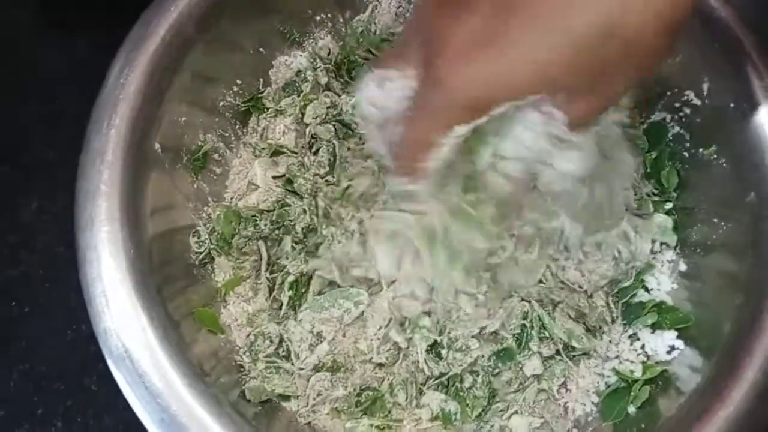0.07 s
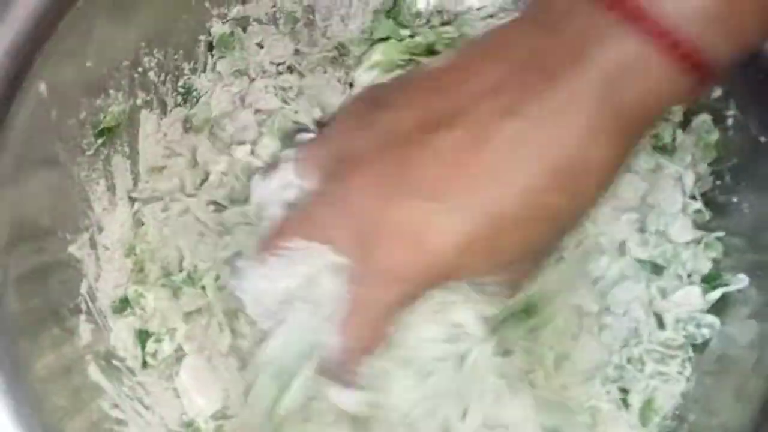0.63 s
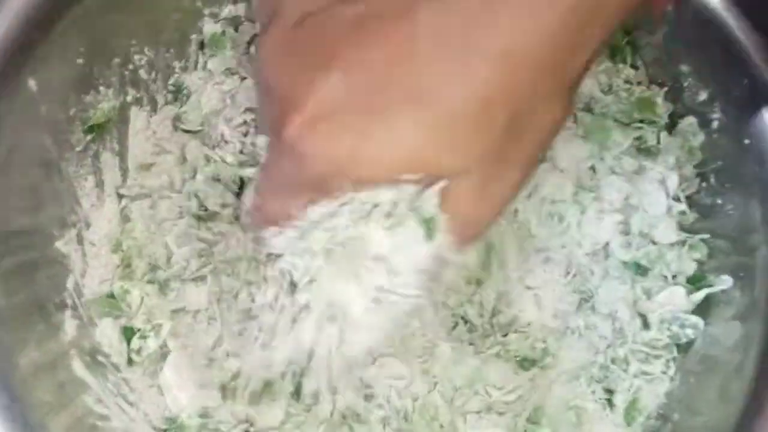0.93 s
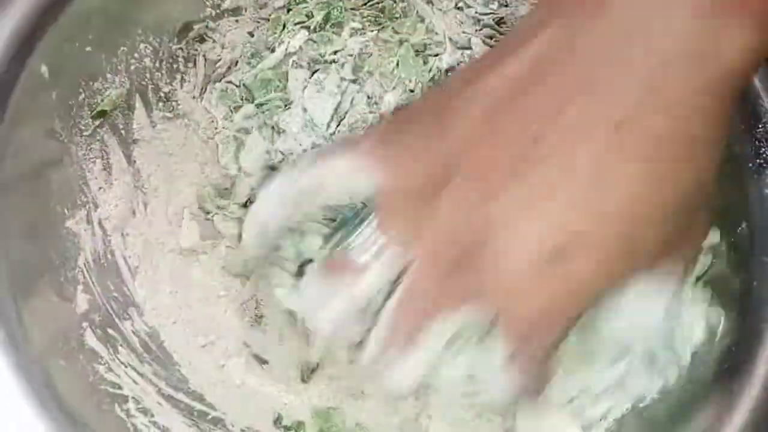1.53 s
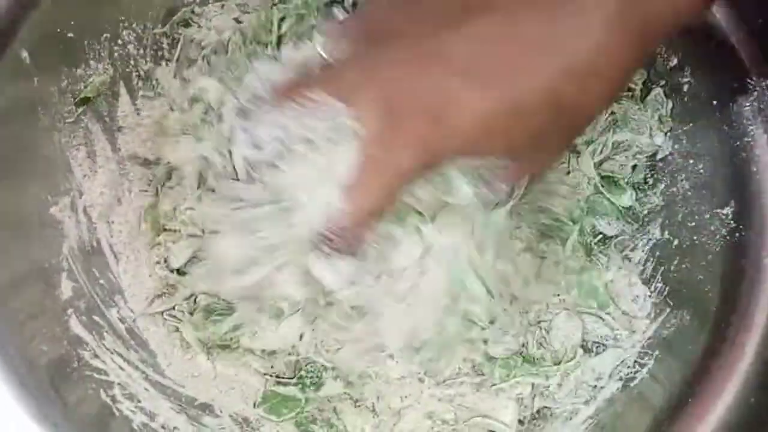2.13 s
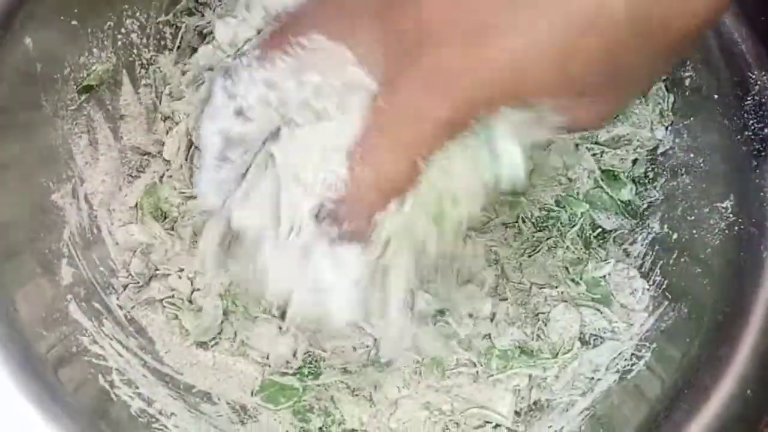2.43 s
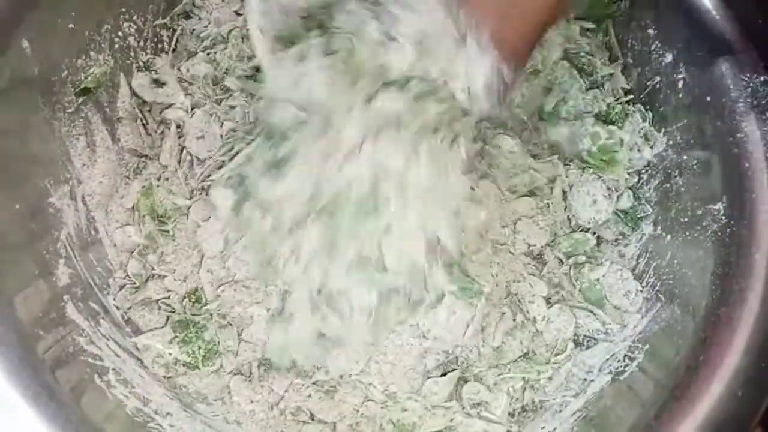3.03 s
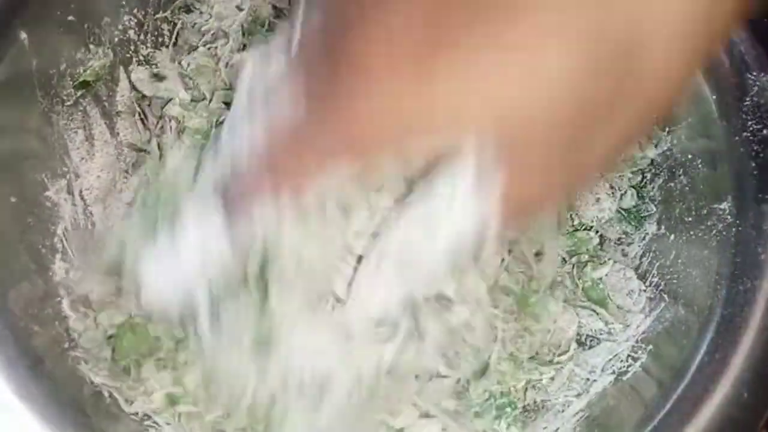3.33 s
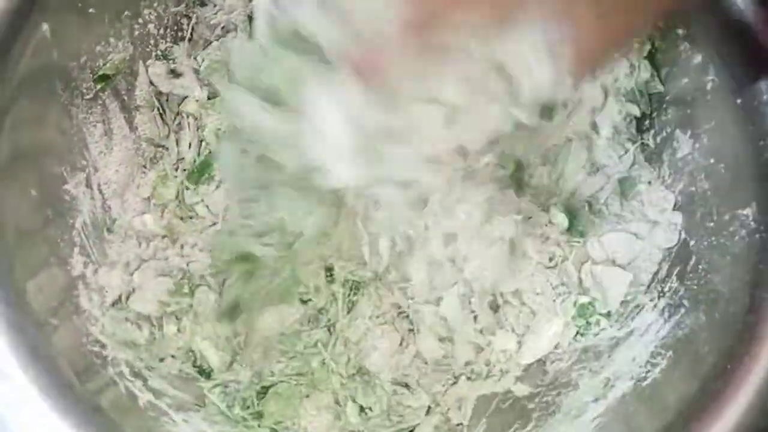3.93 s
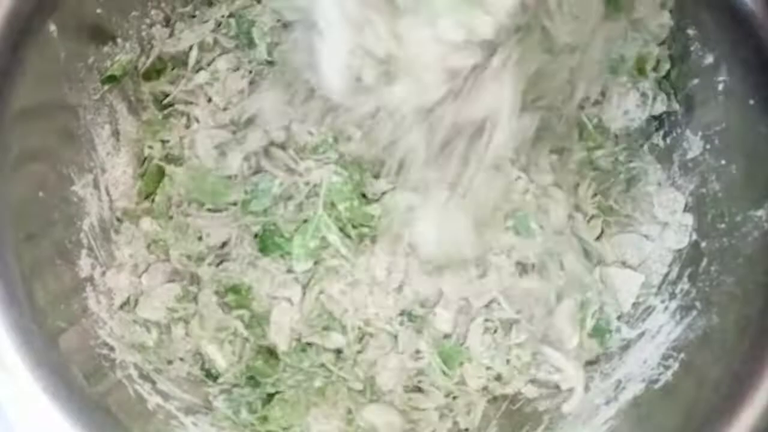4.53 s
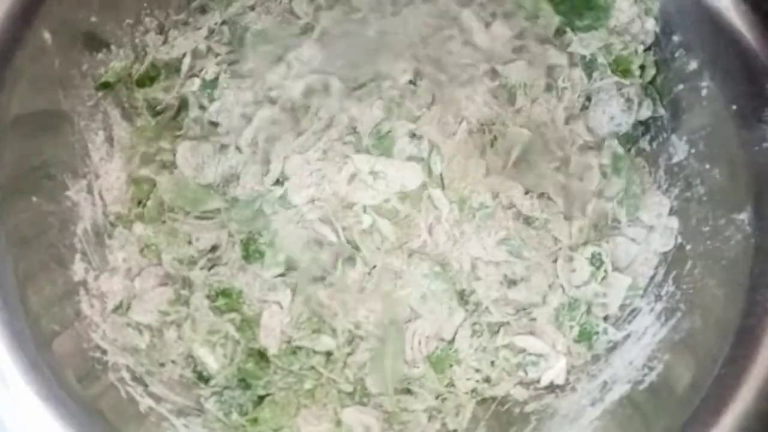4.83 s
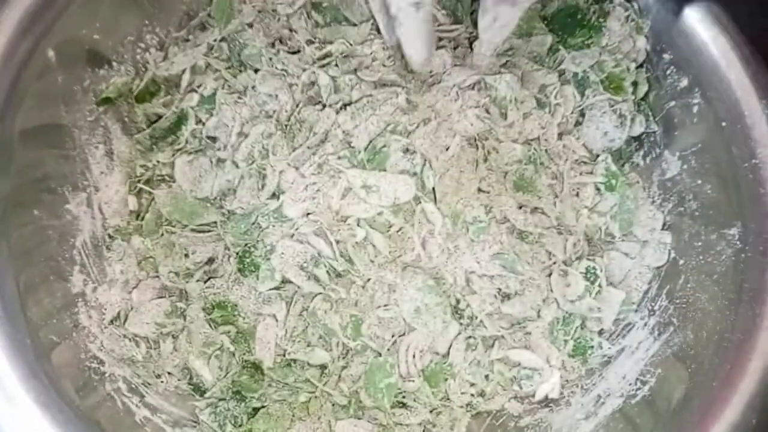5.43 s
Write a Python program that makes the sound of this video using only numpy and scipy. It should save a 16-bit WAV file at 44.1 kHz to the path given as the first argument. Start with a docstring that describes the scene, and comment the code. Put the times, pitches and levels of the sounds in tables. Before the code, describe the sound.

A thin, high hiss swells in during the first half second and holds throughout, over a low room rumble. Close up in a small kitchen, a hand mixes dry flour and chopped leaves in a steel bowl: powder fizzes, leaves crackle and grit sweeps along the metal, with faint rubbing squeaks. Digging strokes come at about 0.4, 1.3, 1.9, 2.5, 2.8, 3.5, 4.2 and 4.7 seconds, strongest at 1.3 and 3.5, and softer trickles of flour fall between them. The hand bumps the bowl with dull, barely ringing thuds, clearest around 0.4, 1.3, 3.7 and 4.3 seconds. A finger ring, nails and stalks tick brightly on the steel, sharpest just after 1.3 seconds and again near 3.7 and 4.2. From 4.5 seconds a few faint chirps sound farther off, clearest near 5.4. The stirring fades after about 4.9 seconds, with two soft bumps around 5.5.

```python
"""A thin, high hiss swells in over a low room rumble and holds. Close up, in a small kitchen, a hand
digs through dry flour and chopped leaves in a steel bowl and lets each handful trickle back.
Countless tiny slips make the powder fizz, the leaves crackle and both sweep along the steel, where
dry rubbing sings faintly. The hand bumps the bowl with a dull thud; a finger ring, nails and stalks
tick on it. Near the end a few faint chirps sound farther off, and the flour settles."""
import sys
import numpy as np
from scipy import signal
from scipy.fft import rfft, irfft, next_fast_len
from scipy.io import wavfile

SR = 44100
rng = np.random.default_rng(int(sys.argv[2]) if len(sys.argv) > 2 else 0)


def dump(signal):
    """Clip the signal to [-1, 1] and save it as 16-bit WAV at the path in sys.argv[1]."""
    limited = np.clip(np.atleast_2d(signal).T, -1, 1)
    pcm = np.round(limited * 32767).astype(np.int16)
    wavfile.write(sys.argv[1], SR, pcm)


N = 245496
TIME = np.arange(N) / SR

# tone of the bed, high hiss and room rumble: (frequency [Hz], relative level [dB])
DRONE_EQ = [(3500, -33), (5000, -34), (5800, -30), (6500, -15.5), (6900, -1), (7450, 4), (7950, -0.5),
            (8300, -10.5), (8750, -27), (9300, -37), (10000, -56), (10450, -31), (11200, -52), (15500, -53)]
RUMBLE_EQ = [(20, -46), (35, -19), (55, -18), (74, 1.5), (88, 0.5), (100, -7.5), (135, 0), (230, -4),
             (330, -1), (480, -8.5), (700, -10.5), (1200, -15.5), (2400, -14.5), (4400, -21), (9000, -24.5),
             (15500, -34)]
# the kitchen's decay: (frequency [Hz], t60 [s])
KITCHEN_DECAY = [(100, 0.15), (500, 0.31), (3000, 0.2), (12000, 0.054)]
# faint chirps, one list of breakpoints each: (time [s], pitch [Hz], level [dB])
CHIRP_GLIDES = [
    [(4.54, 2133, -64), (4.60, 2087, -65), (4.63, 2137, -66)],
    [(5.11, 1880, -54), (5.138, 2050, -53), (5.165, 2040, -59)],
    [(5.364, 2180, -49), (5.375, 2356, -43.5), (5.388, 1980, -57), (5.400, 1800, -47.5), (5.412, 1976, -55),
     (5.424, 2300, -40.5), (5.438, 2004, -57), (5.455, 2270, -57), (5.485, 1810, -57)],
]
# modes of the bowl, damped by its load: (frequency [Hz], relative level [dB], t60 [s])
BOWL_MODES = [(220.3, 1, 0.17), (270, 8.5, 0.052), (299, 7.5, 0.063), (377.6, 8.5, 0.089),
              (504, 8.5, 0.032), (573, 0, 0.06), (622, -8, 0.12), (717.6, 0, 0.15), (789, 11.5, 0.039),
              (1004, 1.5, 0.045), (1203, -9, 0.14), (1653, -9, 0.11), (2410, -5.5, 0.9)]
# the hand bumps the bowl: (time [s], relative ring level [dB], brightness [Hz], thud level [dB],
# thud pitch [Hz], mode with a node at the struck spot [Hz])
BOWL_BUMPS = [(0.192, -57, 1500, -40, 65, 600), (0.411, -54, 1510, -28.5, 310, 794),
              (0.488, -47, 600, -29, 157, 690), (1.087, -53, 400, -35, 160, 506),
              (1.120, -53.5, 1500, -33, 780, 290), (1.272, -28, 890, -21, 337, 873),
              (2.198, -49.5, 2010, -36, 801, 294), (2.848, -47, 1000, -52, 248, 610),
              (2.915, -50.5, 1510, -38, 400, 594), (3.558, -39, 415, -28, 357, 258),
              (3.704, -31, 830, -26, 214, 480), (3.716, -37.5, 900, -44, 207, 1006),
              (3.759, -50, 500, -39, 205, 330), (4.250, -34.5, 587, -32, 410, 680),
              (4.285, -45, 550, -54, 327, 665), (5.506, -49, 300, -36, 303, 497),
              (5.552, -43, 300, -35, 250, 505)]
# ring, nails and stalks on steel: (time [s], level [dB], pitch [Hz], relative scatter level [dB])
STEEL_TICKS = [(1.093, -36, 6400, -3), (1.2728, -26.5, 6850, -0.5), (1.285, -27, 6300, -9),
               (1.3335, -13, 6270, -24), (2.2, -34, 6370, -11), (2.8362, -39, 5900, -8),
               (3.358, -34, 5970, -11), (3.4576, -43, 6300, -13), (3.652, -25, 6300, -9),
               (4.1584, -28.5, 6000, -10), (4.264, -36, 6440, 0), (4.9208, -45, 5860, -9),
               (5.4611, -45, 5740, -12)]
# dry rubbing sings out: (middle [s], half length [s], pitch [Hz], width [Hz], level [dB])
RUB_SQUEAKS = [(0.09, 0.086, 2677, 90, -59.5), (0.374, 0.024, 3055, 250, -62),
               (1.53, 0.074, 2460, 300, -55.5), (1.985, 0.036, 2880, 320, -51),
               (3.63, 0.03, 3010, 400, -51), (4.76, 0.033, 2644, 600, -56)]
# a clump of leaves is crushed: (time [s], level [dB], half length [s], centre [Hz])
LEAF_CRUNCHES = [(0.195, -59, 0.0038, 1400), (0.413, -47, 0.002, 2650), (0.486, -52, 0.0023, 2400),
                 (0.673, -46.5, 0.003, 1290), (1.276, -52, 0.0015, 1650), (1.332, -44, 0.0063, 3600),
                 (1.412, -42, 0.02, 3620), (4.156, -57, 0.0036, 1500)]
# tone of a crunch: (frequency [multiple of its centre], relative level [dB])
CRUNCH_EQ = [(1 / 8, -44), (1 / 2, -22), (2 ** -.25, 0), (2 ** .2, 0), (2 ** .5, -11), (4, -44)]
# tone of leaf crackle, grit on steel and powder fizz: (frequency [Hz], relative level [dB])
LEAF_EQ = [(300, -30), (800, -14.5), (1300, -12), (2100, -11.5), (2550, -0.5), (3000, -4), (3300, -0.5),
           (3850, -2), (4500, -10), (6000, -2.5), (9000, -24)]
SWEEP_EQ = [(3000, -23.5), (4700, -23), (5300, -10), (5750, -3), (6250, 3.5), (6900, 4), (7600, -7),
            (8300, -8), (9000, -25), (12000, -76)]
POWDER_EQ = [(2000, -26), (5000, -7.5), (8600, 3), (9400, -2), (10400, 2.5), (11500, -1.5), (13000, -3.5),
             (15500, -1.5)]
# the hand gathers a handful; levels are before the grip and plunge shaping:
# (start [s], length [s], attack [s], leaves [dB], sweep [dB], powder [dB])
HAND_DIGS = [(0.36, 0.37, 0.16, -48, -51.5, -54.5), (1.272, 0.34, 0.05, -48.5, -40.5, -50),
             (1.917, 0.26, 0.047, -47, -45.5, -53), (2.476, 0.22, 0.064, -52.5, -51, -57.5),
             (2.822, 0.15, 0.023, -46, -41.5, -51.5), (3.526, 0.35, 0.074, -44.5, -37, -48),
             (4.248, 0.17, 0.0069, -48, -40.5, -51), (4.692, 0.11, 0.057, -51, -47.5, -53.5)]
# flour slides off the fingers: (middle [s], half length [s], leaves [dB], sweep [dB], powder [dB])
FLOUR_SPILLS = [(0.116, 0.029, -76, -51, -59), (0.223, 0.018, -67, -57, -60.5),
                (0.764, 0.046, -54, -64, -72), (0.953, 0.12, -60, -60, -69),
                (1.012, 0.02, -55.5, -53, -49.5), (1.101, 0.028, -54.5, -45.5, -52),
                (1.682, 0.059, -56, -59, -59), (1.892, 0.027, -58.5, -58, -58),
                (3.227, 0.065, -61, -61, -65), (3.378, 0.056, -58, -44.5, -58),
                (3.477, 0.041, -54.5, -48.5, -65), (4, 0.037, -58, -58, -63),
                (4.182, 0.044, -54, -51, -55.5), (4.485, 0.063, -51.5, -49.5, -58.5),
                (4.66, 0.064, -65, -55, -61), (4.897, 0.097, -88, -65, -62),
                (5.158, 0.043, -55.5, -51, -60), (5.47, 0.025, -57, -60, -79)]
# light stirring between strokes: (leaves [dB], sweep [dB], powder [dB])
STIR_LEVELS = (-63.5, -58, -64.5)


def amp(db):
    """Decibels to gain."""
    return 10 ** (np.asarray(db) / 20)


def unit(x):
    """Scales to an rms of 1."""
    return x / np.sqrt(np.mean(x ** 2) + 1e-20)


def read(points, hz):
    """Reads a curve on a log-frequency axis."""
    f, value = np.transpose(points)
    return np.interp(np.log(hz + 1), np.log(f + 1), value)


def add(mix, s, sound):
    """Mixes a sound in at time s."""
    part = mix[max(round(s * SR), 0):][:len(sound)]
    part += sound[:len(part)]


def colour(x, eq):
    """Shapes x with an EQ curve and scales it to an rms of 1."""
    size = next_fast_len(len(x))
    gain = amp(read(eq, np.fft.rfftfreq(size, 1 / SR)))
    return unit(irfft(rfft(x, size) * gain, size)[:len(x)])


def wander(rate_hz):
    """Smooth random modulation with an rms of 1."""
    size = next_fast_len(N, True)
    hz = np.fft.rfftfreq(size, 1 / SR)
    return unit(irfft(rfft(rng.standard_normal(size)) / (1 + (hz / rate_hz) ** 4), size)[:N])


def swell(middle_s, half_s):
    """A bell-shaped envelope."""
    return np.exp(-.5 * ((TIME - middle_s) / half_s) ** 2)


def stroke(start_s, length_s, attack_s, release_s):
    """An attack, hold and release envelope."""
    t = TIME - start_s
    return np.clip(t / attack_s, 0, 1) * np.exp(-np.maximum(t - length_s, 0) / release_s)


def drone_and_rumble(drone_db=-40.0, rumble_db=-55.5, flutter_db=0.79, start_db=-3.5, swell_s=0.43):
    """The bed: a narrow high hiss swells, then holds with a slight flutter, over the room's rumble."""
    level_db = drone_db + flutter_db * wander(22) + start_db * np.clip(1 - TIME / swell_s, 0, 1)
    drone = amp(level_db) * colour(rng.standard_normal(N), DRONE_EQ)
    return drone + amp(rumble_db) * colour(rng.standard_normal(N), RUMBLE_EQ)


def kitchen(send, predelay_s=.006, reflections_per_s=2000):
    """Small-room reverb: sparse reflections, each band dying at its own speed."""
    size = SR // 2
    taps = rng.choice([-1., 1.], size) * (rng.random(size) < reflections_per_s / SR)
    hz, t, bands = signal.stft(taps * (TIME[:size] > predelay_s), SR, nperseg=256)
    decay = amp(-60 * t / read(KITCHEN_DECAY, hz)[:, None])
    tail = signal.istft(bands * decay, SR, nperseg=256)[1]
    return signal.fftconvolve(send, tail / np.linalg.norm(tail))[:N]


def chirps(waver=0.013, echo_s=0.0229, echo_db=-8):
    """Thin gliding whistles, each with one slap off a wall."""
    out = np.zeros(N)
    for glide in CHIRP_GLIDES:
        s, hz, db = np.transpose(glide)
        t = np.arange(s[0], s[-1], 1 / SR)
        pitch = np.interp(t, s, hz) * (1 + waver * wander(150)[:len(t)])
        envelope = amp(np.interp(t, s, db)) * signal.windows.tukey(len(t), .1)
        note = envelope * np.sin(2 * np.pi * np.cumsum(pitch) / SR)
        add(out, s[0], note)
        add(out, s[0] + echo_s, amp(echo_db) * note)
    return out


def bumps(thud_cycles=3.6, rise_s=0.0004, ring_trim_db=-9, low_cut_hz=135, node_width=0.12):
    """A soft blow of the hand gives a dead thud and rings the loaded bowl."""
    out, t = np.zeros(N), np.arange(SR // 3) / SR
    hz, mode_db, t60 = np.transpose(BOWL_MODES)[:, :, None]
    polarity = (-1) ** np.arange(len(BOWL_MODES))[:, None]
    modes = polarity * amp(mode_db - 60 * t / t60) * np.sin(2 * np.pi * hz * t)
    attack = 1 - np.exp(-t / rise_s)
    for s, ring_db, bright_hz, thud_db, thud_hz, node_hz in BOWL_BUMPS:
        reach = 1 / np.hypot(1, (hz / bright_hz) ** 2)  # a softer blow reaches fewer high modes
        place = 1 - np.exp(-(np.log(hz / node_hz) / node_width) ** 2)  # silent if struck at its node
        ring = amp(ring_db + ring_trim_db) * (reach * place * modes).sum(0)
        thud = amp(thud_db - 60 * t * thud_hz / thud_cycles) * np.sin(2 * np.pi * thud_hz * t)
        add(out, s, attack * (ring + thud))
    low_cut = signal.butter(2, low_cut_hz, "high", fs=SR, output="sos")
    return signal.sosfilt(low_cut, out)  # the bumps carry little deep bass


def ticks(contact_s=0.0011, scatter_t60=0.064, snap_db=-19, snap_t60=0.019):
    """A brief hard contact pings the steel and scatters grit along it."""
    out, t = np.zeros(N), np.arange(SR // 8) / SR
    contact = (t / contact_s * np.exp(1 - t / contact_s)) ** 3
    for s, db, hz, scatter_db in STEEL_TICKS:
        ping = contact * np.sin(2 * np.pi * hz * t)
        snap = amp(snap_db - 60 * t / snap_t60) * colour(rng.standard_normal(len(t)), POWDER_EQ)
        scatter = amp(scatter_db - 60 * t / scatter_t60) * colour(rng.standard_normal(len(t)), SWEEP_EQ)
        add(out, s, amp(db) * (ping + snap + scatter))
    return out


def singing(hz, width_hz, skirt_ratio=2.3, skirt_db=-7):
    """Slips pass a narrow resonance: a fuzzy whistle."""
    phase = 2 * np.pi * hz * TIME
    a, b = (wander(width_hz / 2) + amp(skirt_db) * wander(skirt_ratio * width_hz / 2) for _ in range(2))
    return unit(a * np.cos(phase) + b * np.sin(phase))


def squeaks():
    """Now and then dry rubbing sings out at a pitch of its own."""
    return sum(amp(db) * swell(s, half_s) * singing(hz, width_hz)
               for s, half_s, hz, width_hz, db in RUB_SQUEAKS)


def rubbing(leaf_gain, stir_db=-68, patchy_db=4, patchy_hz=3.7, follow_db_per_db=0.55):
    """A thin singing rides the leaf rustle, coming and going as the fingers find the steel."""
    patchy_gain = amp(stir_db + patchy_db * wander(patchy_hz))
    follow = (leaf_gain / amp(STIR_LEVELS[0])) ** follow_db_per_db
    return patchy_gain * follow * singing(hz=2978, width_hz=366)


def grains(per_s, spread_db, clump_db):
    """Tiny slips: clicks of uneven size whose level comes in clumps."""
    size = amp(spread_db * np.minimum(rng.exponential(1, N), 4) + clump_db * wander(30))
    return size * rng.choice([-1., 1.], N) * (rng.random(N) < per_s / SR)


def crunches():
    """Crushed clumps of leaves give short bursts of crackle, about an octave wide."""
    out, t = np.zeros(N), np.arange(-SR // 10, SR // 10) / SR
    for s, db, half_s, hz in LEAF_CRUNCHES:
        eq = [(hz * ratio, band_db) for ratio, band_db in CRUNCH_EQ]
        crackle = colour(grains(per_s=2800, spread_db=2.5, clump_db=2.5)[:len(t)], eq)
        add(out, s + t[0], amp(db) * np.exp(-.5 * (t / half_s) ** 2) * crackle)
    return out


def handwork(lift_s=4.85, settle_db_per_s=10, plunge_db=3.5, plunge_s=0.039,
             leaf_lag_s=0.018, grip_db=3, pressure_db=0.5, pressure_hz=5.1):
    """Envelopes of leaves, sweep and powder: digs and spills over a stir that fades as the hand lifts."""
    settling_db = settle_db_per_s * np.maximum(TIME - lift_s, 0)
    power = amp(np.array(STIR_LEVELS)[:, None] - settling_db) ** 2
    for s, length, attack, leaf_db, sweep_db, powder_db in HAND_DIGS:
        slide = stroke(s, length, attack, release_s=0.016)  # flour stops soon after the hand does
        # a quick plunge shoves extra grit along the steel
        shove = slide * amp(plunge_db * swell(s + plunge_s / 2, plunge_s / 2))
        # leaves catch later, settle more slowly and crackle most in mid-stroke, as the fingers close
        grip = np.sin(np.pi * np.clip((TIME - s - leaf_lag_s) / length, 0, 1))
        caught = stroke(s + leaf_lag_s, length, attack, release_s=0.03) * amp(grip_db * (grip - 1.5))
        power += np.array([amp(leaf_db) * caught, amp(sweep_db) * shove, amp(powder_db) * slide]) ** 2
    for s, half_s, *levels_db in FLOUR_SPILLS:
        power += (amp(levels_db)[:, None] * swell(s, half_s)) ** 2
    return np.sqrt(power) * amp(pressure_db * wander(pressure_hz))  # the hand's pressure wavers


def flour_and_leaves():
    """Leaf crackle, grit sliding on steel, powder fizz and a thin singing all follow the hand."""
    leaf_gain, sweep_gain, powder_gain = handwork()
    leaves = leaf_gain * colour(grains(per_s=3000, spread_db=2.5, clump_db=1.96), LEAF_EQ)
    sweep = sweep_gain * colour(grains(per_s=5000, spread_db=3.0, clump_db=-0.9), SWEEP_EQ)
    powder = powder_gain * colour(grains(per_s=7000, spread_db=0.0, clump_db=1.5), POWDER_EQ)
    return leaves + sweep + powder + rubbing(leaf_gain)


def scene():
    """The mono mix: the bowl is close and fairly dry, the chirps farther off and wetter."""
    near = flour_and_leaves() + squeaks() + crunches() + bumps() + ticks()
    far = chirps()
    reverb = kitchen(amp(-14.0) * near + amp(-8.5) * far)
    return (near + far + reverb + drone_and_rumble())[None]


def record(dry):
    """A steep high cut trims the very top of the fizz."""
    high_cut = signal.firwin(511, cutoff=15550, window=("kaiser", 9), fs=SR)
    return signal.oaconvolve(dry, high_cut[None], "same")


dry = scene()
out = record(dry)
dump(out)
```